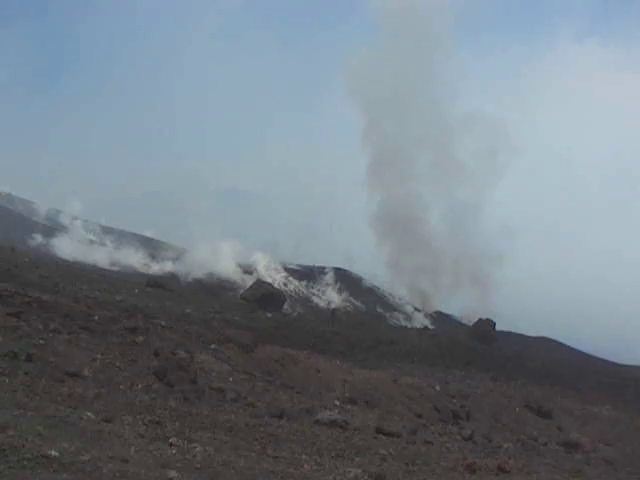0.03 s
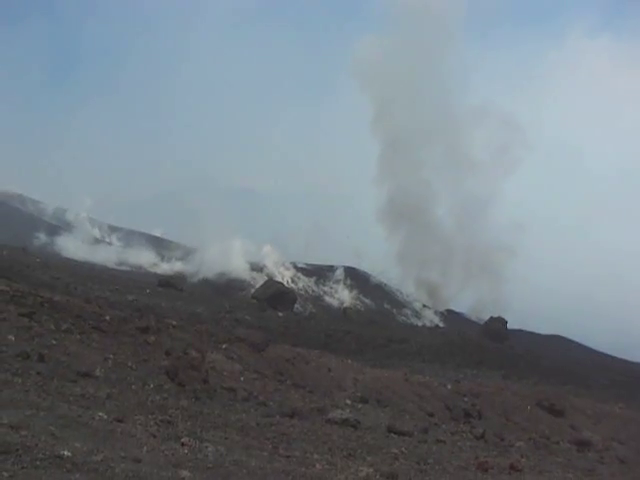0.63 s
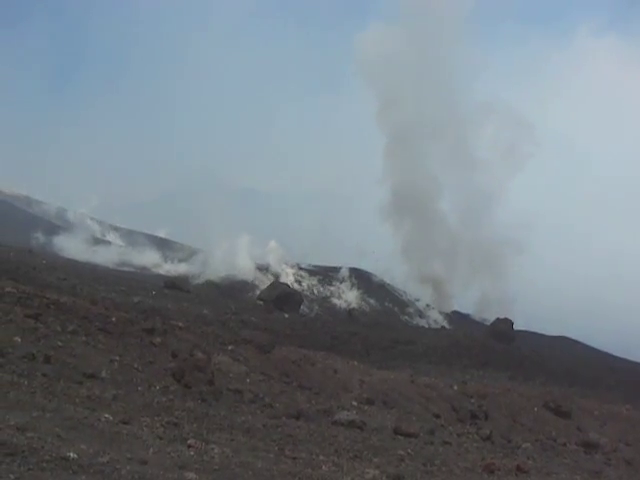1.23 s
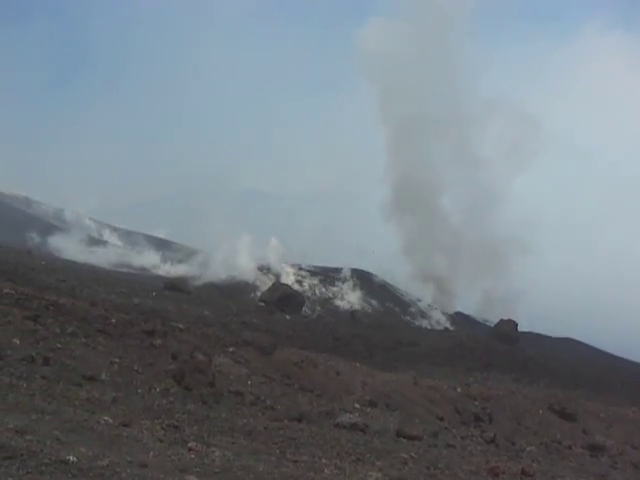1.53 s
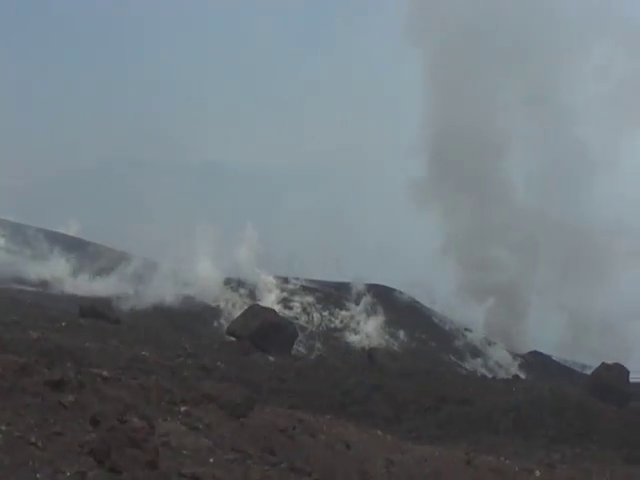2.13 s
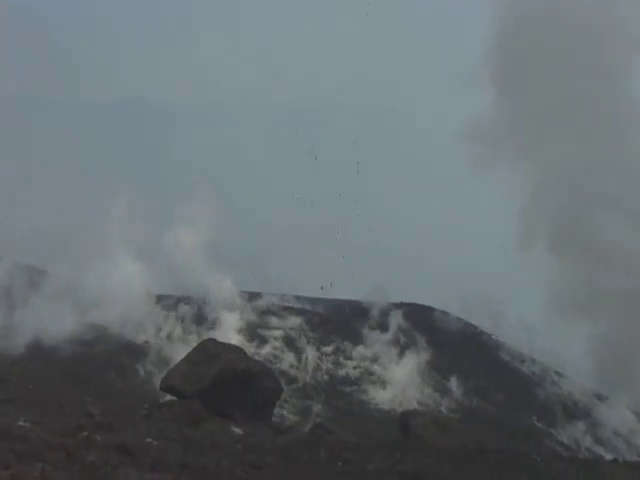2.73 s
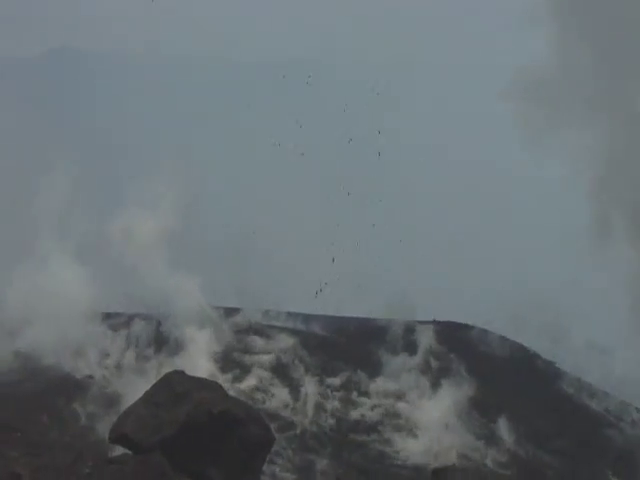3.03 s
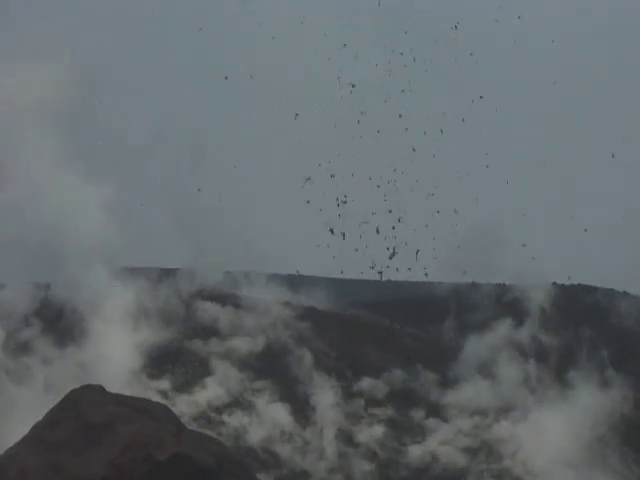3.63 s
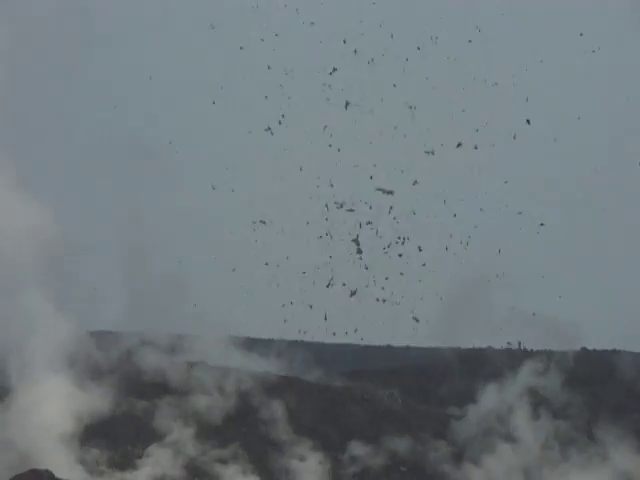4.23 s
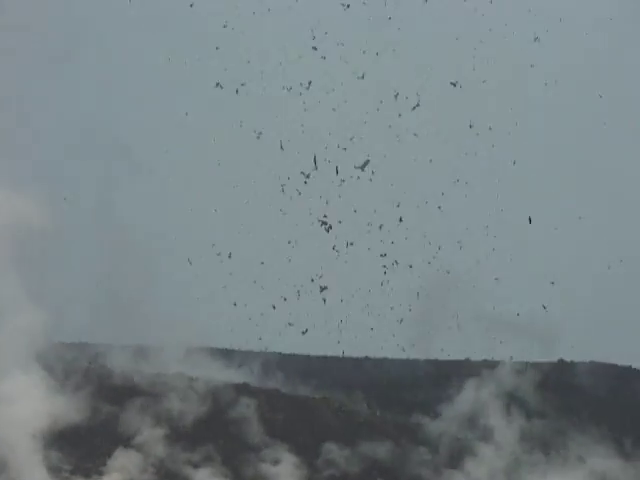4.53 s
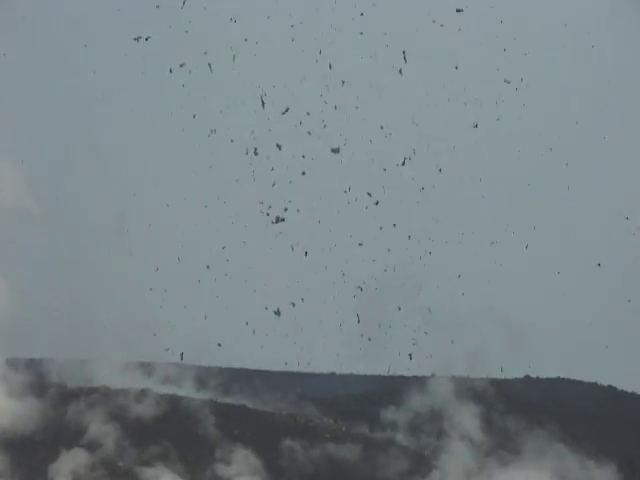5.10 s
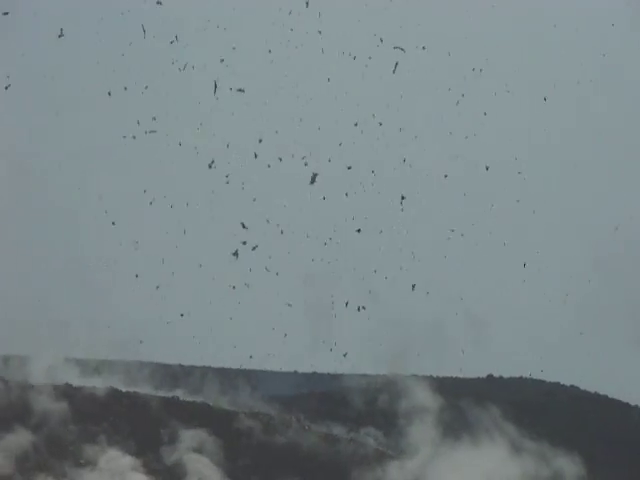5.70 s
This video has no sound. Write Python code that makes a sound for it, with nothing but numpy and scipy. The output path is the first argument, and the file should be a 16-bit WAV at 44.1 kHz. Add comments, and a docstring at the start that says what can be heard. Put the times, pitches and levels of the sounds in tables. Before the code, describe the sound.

On a windy volcanic slope, a small camera clicks on and picks up a distant vent hissing in surges, with gusts rumbling and thumping on the microphone. The hiss eases in the middle while a faint zoom motor whirs close by. After about four seconds a sharp crack comes, and the gas swells into a throaty, pulsing roar that lasts to the end. The sound is rather dull.

```python
"""On a windy volcanic slope, a vent shoots out gas, heard through a small camera.
Tiny swirls in the gas hiss in surges; from four seconds on, big ones swell into a throaty, pulsing roar.
Gusts rumble, short thumps hit the microphone, and one sharp crack comes as the roar begins.
The camera clicks on, its zoom motor whirs for about two seconds, and a finger scrapes it once.
The loudest peaks overload the microphone."""
import sys
import numpy as np
from scipy import signal
from scipy.fft import rfft, irfft
from scipy.io import wavfile

SR = 44100
rng = np.random.default_rng(int(sys.argv[2]) if len(sys.argv) > 2 else 0)


def waveform_to_disk(signal):
    """Save audio, clipped to [-1, 1], as 16-bit WAV at the path in sys.argv[1]."""
    frames = np.transpose(np.atleast_2d(signal))
    scaled = np.clip(frames, -1, 1) * 32767
    samples = np.round(scaled).astype(np.int16)
    wavfile.write(sys.argv[1], SR, samples)


N = 254016
TIME = np.arange(N) / SR
FREQS = np.fft.rfftfreq(N, 1 / SR)

# Levels in the tables are relative: the functions set the final loudness.
# tone of the gas jet's hiss and of its roar: f/Hz, level/dB
HISS_TONE = [(100, -30.5), (300, -17), (700, -4.5), (950, -1), (1300, 0), (1850, -2), (2100, -2.5),
             (2600, -6.5), (3300, -7.5), (3700, -14.5), (4400, -28.5)]
ROAR_TONE = [(40, -35.5), (100, -27), (160, -13), (215, -9.5), (285, -16), (420, -2.5), (540, 2),
             (760, 1.5), (880, -3.5), (1100, -10), (1400, -26.5), (1720, -22.5), (2200, -29), (4000, -45)]
# surges of gas: start t/s, length/s, rise/s, hiss level/dB, fade/(dB per s), roar compared with hiss/dB
GAS_SURGES = [(0.016, 0.28, 0.017, -16.5, 34.5, -5.5), (0.456, 0.47, 0.096, -13, 11, -3),
              (0.926, 0.36, 0.079, -14, 19, -3), (1.253, .21, 0.13, -16, 0, -2.5),
              (1.516, 0.31, 0.015, -21.5, -7, -3), (2.173, 0.15, 0.087, -22.5, -3.5, 0),
              (2.42, 0.1, .025, -17.5, 23.5, -5), (2.548, 0.15, 0.034, -22, -2.5, -10),
              (3.726, 0.21, 0.027, -18.5, 5.5, -17), (3.995, 0.24, 0.021, -13, 13, -2),
              (4.416, 0.58, 0.31, -10.5, 5, -4.5), (5.038, 0.82, 0.038, -15, 0, -3)]
# level of the steady hiss and roar between surges, quieter in the middle: t/s, level/dB
BASE_LEVELS = [(0, -21.5), (1.9, -25), (2.08, -24), (2.7, -26.5), (2.9, -28.5), (3.05, -26.5), (3.35, -27),
               (3.7, -27), (4.0, -22), (4.4, -19.5)]
# throaty blasts from the vent: start t/s, length/s, rise/s, roar level/dB
ROAR_BLASTS = [(4.115, 0.071, 0.04, -10.5), (4.211, 0.055, 0.043, -9.5), (4.495, 0.07, 0.027, -8),
               (4.623, 0.28, 0.16, -13.5), (4.909, 0.047, 0.022, -10.5), (5.051, 0.35, .03, -13),
               (5.42, 0.72, 0.28, -11.5)]
# tone of the wind's rumble: f/Hz, level/dB
WIND_TONE = [(15, -35), (40, -28), (75, -5.5), (130, -1), (230, -1), (330, -3.5), (450, -1.5), (700, -12),
             (2000, -35), (4000, -55.5)]
# the breeze on the microphone: t/s, level/dB
BREEZE_LEVELS = [(0, -23), (.35, -19), (.55, -18.5), (.68, -26.5), (1.65, -22), (1.95, -31.5), (2.35, -25),
                 (2.8, -25.5), (2.92, -30), (3.65, -27.5), (3.85, -33.5), (4.45, -24), (4.7, -44),
                 (5.2, -35), (5.65, -26)]
# gusts on top of the breeze: peak t/s, level/dB, half length/s
WIND_GUSTS = [(0.033, -11.5, 0.026), (0.173, -11.5, 0.049), (0.436, -12.5, 0.031), (0.759, -18.5, 0.048),
              (0.958, -14.5, 0.038), (1.219, -18.5, 0.043), (1.32, -13.5, 0.026), (1.56, -21, 0.021),
              (2.23, -21.5, 0.073), (3.122, -27, 0.024), (3.309, -21.5, 0.043), (4.087, -16.5, 0.054)]
# short thumps on the microphone, and one sharp crack as the roar begins:
# middle t/s, level/dB, f/Hz, half length/s
THUMPS_AND_CRACK = [(0.164, -17, 56, 0.0098), (0.168, -9, 260, 0.005), (0.195, -9, 152, 0.0052),
                    (0.222, -8.5, 216, 0.0094), (0.43, 0, 307, 0.0041), (0.758, -4.5, 410, 0.0019),
                    (0.955, -5.5, 260, 0.0021), (1.270, -9.5, 204, 0.0059), (1.313, -12.5, 200, 0.006),
                    (3.290, -12.5, 172, 0.0022), (3.359, -18.5, 271, 0.0063), (3.376, -7.5, 192, 0.0022),
                    (3.403, -20, 306, 0.0055), (4.102, -8, 160, 0.0034), (4.121, 0.5, 450, 0.00062)]
# loudness of the zoom motor: t/s, level/dB
ZOOM_LEVELS = [(1.55, -51), (1.9, -40), (2.6, -38), (3.2, -36.5), (3.7, -34.5), (4.1, -30), (4.3, -60)]
# pitches the camera case boosts or weakens: f/Hz, width/Hz, level change/dB
CASE_BANDS = [(784, 35, 0.5), (1210, 90, 4), (1770, 130, 4.5), (2063, 74, -2), (2140, 88, -1.5),
              (2522, 130, -2.5), (2920, 74, 1.5), (3490, 450, 2)]
# the camera's double click as it switches on: start t/s, length/s
POWER_CLICKS = [(0.0365, .0008), (0.0387, 0.00068)]


def gas_jet(roar_db=-1.94, waver_db=0.62, flutter_db=0.44, throb_db=0.88, crackle_db=-11):
    """Tiny swirls hiss, big ones throb in the vent's throat, and small shocks crackle in the hiss."""
    hiss_gain, roar_gain = vent_gains()
    waver = band_noise(centre_hz=11.3, width_hz=5)
    flutter = band_noise(centre_hz=22.6, width_hz=20)
    throb = band_noise(centre_hz=28.8, width_hz=12)
    shock_starts = rng.random(N) < 300 / SR  # about 300 a second
    shocks = shock_starts * np.minimum(rng.exponential(1, N), 3)
    hiss = rushing_air(HISS_TONE, steady_s=0.032) + amp(crackle_db) * shape_tone(shocks, HISS_TONE)
    roar = rushing_air(ROAR_TONE, steady_s=0.28) * amp(throb_db * throb)
    wobble = amp(waver_db * waver + flutter_db * flutter)
    return hiss_gain * unit(hiss * wobble) + amp(roar_db) * roar_gain * unit(roar * wobble)


def vent_gains():
    """How loud hiss and roar are: both share a base level, surges add to both, blasts only to the roar."""
    hiss_power = amp(curve(BASE_LEVELS)) ** 2
    blasts = sum(outburst(*row, fade_db_per_s=0, tail_s=0.12) for row in ROAR_BLASTS)
    roar_power = hiss_power + blasts
    for *shape, roar_db in GAS_SURGES:
        surge = outburst(*shape, tail_s=0.074)
        hiss_power += surge
        roar_power += surge * amp(roar_db) ** 2
    return np.sqrt(hiss_power), np.sqrt(roar_power)


def outburst(start_s, length_s, rise_s, db, fade_db_per_s, tail_s):
    """The power of one push of gas: it rises, holds or drifts in level, then dies away."""
    age = np.maximum(TIME - start_s, 0)
    rise = np.minimum(age / rise_s, 1)
    tail = np.exp(-np.maximum(age - length_s, 0) / tail_s)
    return (rise * amp(db - fade_db_per_s * age) * tail) ** 2


def wind(rumble_db=-4.0, lump_db=1.5):
    """Air swirling past the microphone makes a lumpy rumble that swells with each gust."""
    gusts = sum(amp(db) ** 2 * bell(TIME, peak_s, half_s) for peak_s, db, half_s in WIND_GUSTS)
    power = amp(curve(BREEZE_LEVELS)) ** 2 + gusts
    lumps = band_noise(centre_hz=35.5, width_hz=17)
    rumble = rushing_air(WIND_TONE, steady_s=0.034) * amp(lump_db * lumps)
    return amp(rumble_db) * np.sqrt(power) * unit(rumble)


def thumps_and_crack(roughness=0.031):
    """Quick swings of pressure at the microphone sound as thumps; the shortest is a sharp crack."""
    swings = np.zeros(N)
    for middle_s, db, hz, half_s in THUMPS_AND_CRACK:
        near = abs(TIME - middle_s) < 6 * half_s
        t = TIME[near] - middle_s
        swings[near] -= amp(db) * np.sin(2 * np.pi * hz * t) / np.cosh(np.pi / 2 * t / half_s)
    return swings * (1 + roughness * band_noise(centre_hz=150, width_hz=460))


def zoom_motor(rattle_db=2, gear_db=-5):
    """The lens motor whirs unevenly over the fine hiss of its gears."""
    rattle = band_noise(centre_hz=35, width_hz=34)
    gears = amp(gear_db) * band_noise(centre_hz=2850, width_hz=1100)
    whir = band_noise(centre_hz=2860, width_hz=150)
    return amp(curve(ZOOM_LEVELS)) * unit((whir + gears) * amp(rattle_db * rattle))


def finger_scrape(at_s=3.8, db=-25, half_s=0.0039):
    """A finger slips on the camera body with one short scrape."""
    return amp(db) * bell(TIME, at_s, half_s) * band_noise(centre_hz=3360, width_hz=890)


def camera_case(sound, overall_db=-3.5):
    """Small hollows in the case boost some pitches and weaken others."""
    change_db = sum(db * bell(FREQS, hz, width_hz) for hz, width_hz, db in CASE_BANDS)
    return irfft(rfft(sound) * amp(change_db + overall_db), N)


def level_dip(at_s=3.378, depth_db=-9, recover_s=0.06):
    """The level drops briefly after one thump and creeps back."""
    return amp(depth_db * (TIME > at_s) * np.exp(-abs(TIME - at_s) / recover_s))


def rushing_air(tone, steady_s):
    """Noise with the given tone; swings in loudness much slower than steady_s are evened out."""
    noise = shape_tone(rng.standard_normal(N), tone)
    smooth_power = irfft(rfft(noise ** 2) * bell(FREQS, 0, 1 / steady_s), N)
    return noise / np.sqrt(np.maximum(smooth_power, 0.05))


def shape_tone(sound, tone):
    """Turns a sound's lows and highs up or down to follow a tone table, at average power 1."""
    hz, db = np.transpose(tone)
    gain = amp(np.interp(np.log(FREQS + 1), np.log(hz), db))
    return unit(irfft(rfft(sound) * gain, N))


def band_noise(centre_hz, width_hz):
    """Noise gathered around one frequency, at average power 1."""
    return unit(irfft(rfft(rng.standard_normal(N)) * bell(FREQS, centre_hz, width_hz), N))


def bell(x, centre, width):
    """A smooth hump, 1 at its centre and about a third of that one width away."""
    return np.exp(-((x - centre) / width) ** 2)


def curve(points):
    """Joins points with straight lines over time."""
    return np.interp(TIME, *np.transpose(points))


def amp(db):
    """Turns decibels into a number to multiply by."""
    return 10 ** (np.asarray(db) / 20)


def unit(x):
    """Scales a signal to average power 1."""
    return x / np.sqrt(np.mean(x ** 2) + 1e-20)


def scene():
    """The far vent, the wind and the camera's own noises meet at one microphone."""
    ongoing = camera_case(gas_jet()) + zoom_motor() + wind()
    return (ongoing * level_dip() + thumps_and_crack() + finger_scrape())[None]


def record(dry, on_s=0.036, soft_limit=1.31, hard_limit=0.71, click_gain=0.43):
    """The microphone clicks on, dulls the highs, and rounds off and clips the loudest peaks."""
    rounded = soft_limit * np.tanh(dry / soft_limit) * (TIME > on_s)
    mic_filter = signal.firwin(241, 4230, window=("kaiser", 8), fs=SR)  # cuts above 4230 Hz
    dulled = signal.oaconvolve(rounded, mic_filter[None], "same")
    clicks = sum((TIME > start_s) & (TIME < start_s + length_s) for start_s, length_s in POWER_CLICKS)
    clipped = np.clip(dulled - click_gain * clicks, -hard_limit, hard_limit)
    top_filter = signal.firwin(511, 15800, window=("kaiser", 9), fs=SR)  # cuts above 15800 Hz
    return signal.oaconvolve(clipped, top_filter[None], "same")


dry = scene()
out = record(dry)
waveform_to_disk(out)
```